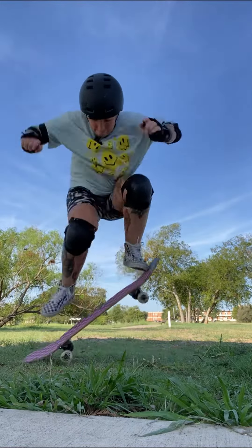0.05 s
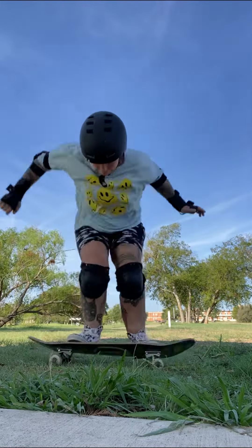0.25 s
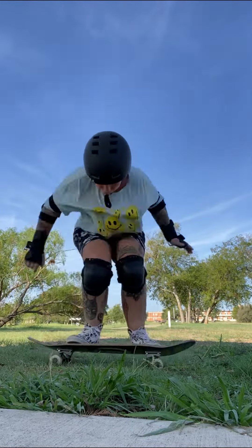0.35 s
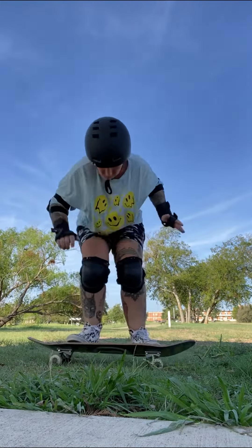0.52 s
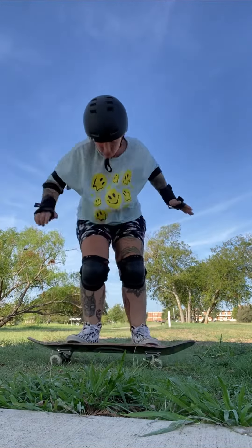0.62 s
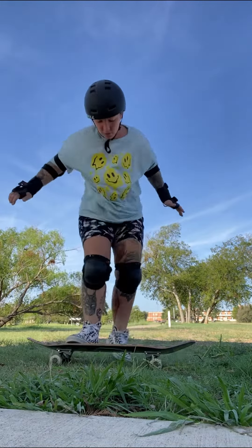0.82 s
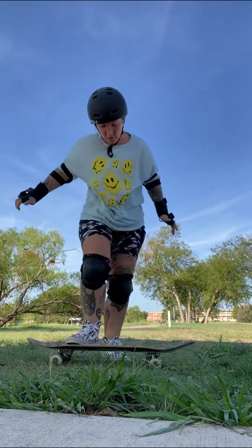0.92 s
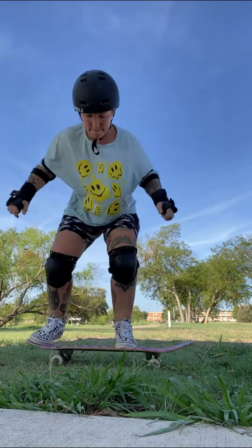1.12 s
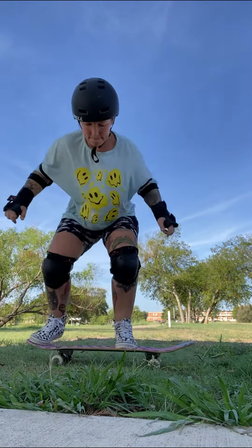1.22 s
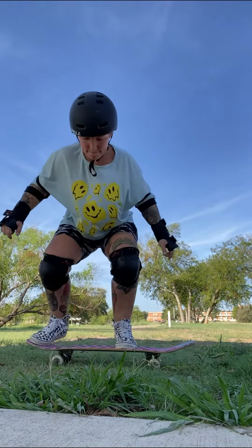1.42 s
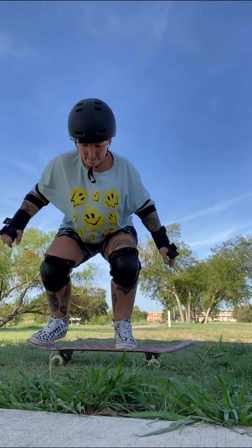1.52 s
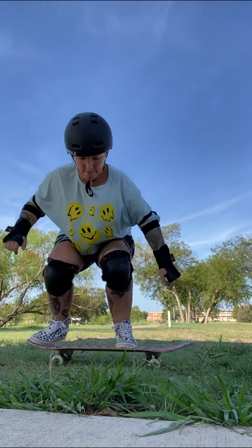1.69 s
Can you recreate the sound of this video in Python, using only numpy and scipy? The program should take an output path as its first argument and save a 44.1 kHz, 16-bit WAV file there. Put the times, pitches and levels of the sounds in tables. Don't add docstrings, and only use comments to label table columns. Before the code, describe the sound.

Hard woody skateboard knocks in three bursts, with truck rattle and faint shoe scuffs outdoors

```python
import sys
import numpy as np
from scipy import signal
from scipy.fft import rfft, irfft
from scipy.io import wavfile
from scipy.ndimage import uniform_filter1d

SR = 44100
rng = np.random.default_rng(int(sys.argv[2]) if len(sys.argv) > 2 else 0)


def to_wav(s):
    ch = np.atleast_2d(s).T
    pcm = np.round(np.clip(ch, -1, 1) * 32767)
    wavfile.write(sys.argv[1], SR, pcm.astype(np.int16))


def ratio(d):
    e = np.asarray(d, float) / 20
    return 10 ** e


N = 77175

# t/s, level/dB, favoured f/Hz, focus/(dB per octave squared), ring length/factor
SLAM_BLOWS = [(.2005, -15.5, 1390, 4, 0.5), (.2035, -8.5, 1270, 7.5, 0.46), (.2060, -8, 640, 5, 0.52),
              (.2125, -13.5, 1700, 11, 0.84), (.2215, -4, 420, 21, 0.22), (.2130, -8.5, 125, 3, 0.63),
              (.2265, -8.5, 149, 5.5, 0.74), (.2245, -16, 597, -0.5, 0.15), (.2320, -20, 197, 3, 0.72),
              (.2360, -18.5, 750, 21, 0.25), (.279, -34.5, 1680, 9, 0.58)]
TAIL_BLOWS = [
    (.6028, -7.5, 1600, 1.4, 0.15),
    (.6048, -7.5, 2510, 1.47, 0.33),
    (.6075, -13.5, 605, 2.56, 0.38),
    (.6120, -22, 920, 3, 0.35),
    (.6875, -25, 1360, 3.9, 0.25),
    (.8560, -20, 2500, 7.2, 0.46),
    (.8570, -8.5, 706, 4.8, 0.24),
    (.8580, -14, 2370, 6.2, 0.24),
    (.9042, -8.5, 2630, 2.8, 0.32),
]
STAMP_BLOWS = [(.8600, -12.5, 111, 5.6, 0.28), (.8610, -29, 1200, 1.02, 0.27), (.8700, -19, 1136, 16, 0.32),
               (.8845, -19.5, 820, 4.1, 0.24), (.9044, -2.5, 590, 2.6, 0.29), (.9080, -8.5, 140, 7.4, 0.41),
               (.9105, -14.5, 560, 1.1, 0.26), (.9135, -10.5, 550, 5, 0.31), (.9310, -11, 131, 2.5, .3),
               (.9210, -8, 695, 1.3, 0.38), (.9280, -10, 790, 0.87, 0.14), (.9390, -15, 606, 1.2, 0.4),
               (.9560, -11.5, 786, 33, 0.28), (.9680, -27, 720, 2.4, 0.93), (1.0590, -27, 910, 16, 0.32)]
JIGGLE_BLOWS = [
    (.0040, -31, 950, 10, 0.53),
    (.0130, -35.5, 900, 0.72, 0.25),
    (.0220, -34.5, 470, 20, 0.5),
    (.1040, -29, 920, 3.6, 0.35),
    (.1100, -37, 1200, 0.9, 0.25),
    (.1160, -45, 710, 1.5, 0.63),
    (.1545, -29, 680, 3.6, 1),
    (.4700, -27.5, 1700, 18, 0.35),
    (.4900, -23, 252, 19, 0.38),
]
# f/Hz, level/dB, t60/s
LOADED_DECK_MODES = [(74.8, -8.5, 0.34), (144.6, -3.5, 0.12), (234, -10.5, 0.11), (329, -8, 0.12),
                     (447.5, 3.5, 0.08), (555, -1, 0.092), (657.6, 8, 0.09), (752, -13, 0.05),
                     (1033, -3.5, 0.084), (1330, 1, 0.026), (1710, 3.5, 0.026), (1850, 2, 0.026),
                     (2780, -50, .05)]
TAIL_MODES = [(237, 7.5, 0.087), (510, 6, 0.031), (827, -1.5, 0.045), (1288, -1, 0.097), (1397, -4, 0.057),
              (1700, -6.5, 0.11), (1070, -10, 0.025), (1955, -9, 0.057), (2060, -28, 0.095),
              (2210, 6.5, 0.018), (2660, 3.5, 0.023), (3220, 2, 0.057), (4470, 8, 0.0058),
              (3810, -7.5, 0.013)]
FREE_DECK_MODES = [(103, -3, 0.17), (155, -4, 0.11), (261.3, -3.5, 0.16), (370, -14, .12),
                   (470, -4.5, 0.19), (567, 0.5, 0.13), (649.7, -11.5, 0.34), (744, -2, 0.087),
                   (849.7, -11, 0.32), (960, -8, 0.17), (1153, -3, 0.082), (1461, -8.5, 0.11),
                   (1920, -5, 0.028), (2900, -17, 0.12)]
# t/s, level/dB, t60/s, centre f/Hz, sizzle/dB
RATTLES = [(.0, -31.5, 0.18, 950, -4.5), (0.098, -42, 0.17, 1500, -3), (0.151, -38, 0.24, 1060, -3.5),
           (0.198, -22.5, 0.18, 1070, -18), (0.208, -26, 0.09, 1600, -3), (0.236, -35, 0.23, 1650, -11),
           (0.607, -34, 0.01, 3030, -16), (0.61, -29.5, 0.28, 2900, -22), (0.612, -30.5, 0.26, 585, -35.5),
           (0.854, -40, 0.04, 2790, -35.5), (0.858, -30.5, 0.52, 1530, -27), (0.903, -21, 0.042, 3000, -20),
           (0.905, -19.5, 0.25, 1510, -14), (0.916, -29, 0.2, 3500, -16), (1.058, -44.5, 0.16, 1740, -30)]
# t/s, level/dB, f/Hz, t60/s
HARD_TICKS = [(0.3793, -34, 3020, 0.0066), (0.3803, -46, 7300, 0.013), (0.4486, -33.5, 3030, 0.019),
              (0.451, -40.5, 7000, 0.0034), (.815, -48, 12500, 0.019), (1.227, -51, 3400, 0.011),
              (1.248, -50, 3650, 0.013), (0.0138, -28.5, 5100, 0.0053), (.003, -38, 7000, .01),
              (0.011, -40, 8200, 0.01), (.023, -36, 13000, 0.0098), (.035, -43, 7600, 0.02),
              (0.036, -40, 13000, 0.021), (1.058, -45.5, 5500, .03), (0.1, -44, 9200, 0.023),
              (.1531, -41.5, 5200, .012), (.1535, -44, 12800, 0.032), (.166, -31, 13500, .008),
              (.168, -40, 4700, .015), (0.178, -36, 12500, 0.016), (.179, -49, 7500, .012),
              (0.192, -49, 7700, .008), (0.2007, -29, 7400, 0.036), (.201, -31, 12900, 0.038),
              (0.215, -32, 6000, 0.018), (0.2138, -20, 12500, 0.015), (0.239, -36, 7000, 0.01),
              (0.237, -35, 12500, 0.014), (0.471, -47, 7450, .012), (0.483, -51, 7500, .01),
              (.553, -54.5, 7500, .01), (.592, -46, 6000, 0.02), (0.6024, -27, 7000, 0.0092),
              (.604, -42, 13000, .008), (.612, -46, 7400, 0.011), (.6871, -54, 7000, 0.007),
              (.7524, -41, 3000, 0.016), (0.8569, -24, 2980, .02), (0.889, -37, 7500, 0.017),
              (0.9021, -34, 5000, .01), (0.908, -22.5, 8200, 0.014), (0.939, -29, 8000, .01)]
# start t/s, length/s, level/dB
SOLE_DRAGS = [
    (0.242, 0.28, -58),
    (0.594, 0.23, -48),
    (1.006, 0.058, -44),
    (1.136, 0.12, -58),
    (1.415, .4, -51.5),
]
# f/Hz, width/Hz, level/dB
GRIP_BANDS = [(1200, 160, -4.5), (1700, 2400, -3.5), (3010, 700, 1), (3540, 180, -3.5), (4760, 1430, -4.5),
              (7000, 9800, -32.5)]
# f/Hz, level/dB per Hz
TOWN_SPECTRUM = [(45, -16.5), (114, -17.5), (180, -18.5), (320, -27), (700, -28.5), (1530, -37.5),
                 (4000, -46.5), (9000, -61)]
# t/s, level/dB
TOWN_LEVEL = [(.3, -39.5), (.48, -44), (.54, -46), (.62, -42.5), (1.0, -39.5), (1.1, -46.5), (1.34, -51),
              (1.45, -48)]
# f/Hz, width/Hz, level/dB
MACHINE_PARTIALS = [(58.2, 31, -50), (112.5, 21, -44.5), (143, 11, -67.5), (178, 20, -55.5)]
# f/Hz, width/Hz, turn/half turns
PORT_RESONANCES = [(5700, 450, 1.4), (9250, 200, 1), (11700, 200, 1), (14300, 250, 1)]

UNLIKE_DB = -11
BLUR_SAMPLES = 2048


def band(x, hz, width):
    return signal.lfilter(*signal.iirpeak(min(hz, .45 * SR), max(hz / width, .2), fs=SR), x)


def steep_band(x, hz, width):
    return band(band(x, hz, width), hz, width)


def unit(x):
    return x / np.sqrt(np.mean(x ** 2))


def walk(rate_hz):
    hold = int(SR / rate_hz)
    steps = np.repeat(rng.standard_normal(N // hold + 1), hold)
    return 0.82 * uniform_filter1d(uniform_filter1d(steps, hold), hold)[:N]


def two_port_noise(length, unlike):
    return rng.standard_normal(length) + unlike * rng.standard_normal((2, length))


def grit(rough_db):
    size = ratio(rough_db * rng.exponential(size=N))
    return unit(size * two_port_noise(N, ratio(UNLIKE_DB)))


def knocks(blows, modes):
    scatter_db, detune = 1.2, .012
    spread_cycles = 0.56
    out = np.zeros(N)
    hz, mode_db, t60 = np.array(modes).T[:, :, None]
    sign = (-1.) ** np.arange(len(modes))[:, None]
    luck = rng.standard_normal((len(blows), 2, len(modes), 1))
    for (s, level_db, best_hz, focus_db, ring), (vary, turn) in zip(blows, luck):
        first = int(s * SR) + 1
        age = np.arange(first, min(int(s * SR) + SR // 4, N)) / SR - s
        off_focus_db = focus_db * np.log2(hz / best_hz) ** 2
        gain = ratio(level_db + mode_db - off_focus_db + scatter_db * vary)
        swell = 1 - np.exp(-(age * hz / spread_cycles) ** 2)
        decay = 1000. ** (-age / (np.minimum(t60, .3) * ring))
        tone = sign * np.sin(2 * np.pi * hz * (1 + detune * turn) * age)
        out[first:][:len(age)] += (gain * swell * decay * tone).sum(axis=0)
    return out


def scatter(x):
    echo_db, echo_t60_s, echo_low_hz = -11.5, 0.068, 503
    age = np.arange(BLUR_SAMPLES) / SR
    echo = rng.standard_normal((2, BLUR_SAMPLES)) * 1000. ** (-age / echo_t60_s)
    echo = echo / np.sqrt((echo ** 2).sum(axis=1, keepdims=True))
    echo = signal.lfilter(*signal.butter(1, echo_low_hz, "high", fs=SR), echo)
    return x + ratio(echo_db) * signal.fftconvolve(x[None], echo)[:, :N]


def rattle(t):
    grain_db, chatter_db, attack_s = 2.4, 1.8, 0.0005
    out = 0
    for s, db, t60, hz, sizzle_db in RATTLES:
        grains = grit(grain_db)
        treble_edge = signal.butter(2, hz * 1.92, fs=SR)
        body = unit(signal.lfilter(*treble_edge, steep_band(grains, hz, hz * 2)))
        sizzle = sum(steep_band(grains, sizzle_hz, 4100) for sizzle_hz in (8900, 12800))
        age = np.maximum(t - s, 0)
        envelope = np.minimum(age / attack_s, 1) * 1000. ** (-age / t60)
        out = out + ratio(db + chatter_db * walk(150)) * envelope * (body + ratio(sizzle_db) * sizzle)
    return out


def ticks():
    out = np.zeros((2, N + BLUR_SAMPLES))
    age = np.arange(BLUR_SAMPLES) / SR
    for s, db, hz, t60 in HARD_TICKS:
        click = unit(steep_band(two_port_noise(BLUR_SAMPLES, ratio(UNLIKE_DB)), hz, hz * .7))
        out[:, int(s * SR):][:, :BLUR_SAMPLES] += ratio(db) * 1000. ** (-age / t60) * click
    return out[:, :N]


def scuffs(t):
    rise_s, flutter_db = .02, 1.4
    drag = 0
    for s, length, db in SOLE_DRAGS:
        drag = drag + ratio(db) * np.clip(np.minimum(t - s, s + length - t) / rise_s, 0, 1)
    rasp = 0
    for hz, width, db in GRIP_BANDS:
        ringing = unit(band(band(grit(2.87), hz, width), hz, 2 * width))
        rasp = rasp + ratio(db + flutter_db * walk(18.56)) * ringing
    return drag * unit(rasp)


def machine():
    out = 0
    for hz, width, db in MACHINE_PARTIALS:
        out = out + ratio(db) * unit(steep_band(rng.standard_normal(N), hz, width))
    return out


def town(t):
    rumble = 0
    table_hz, table_db = np.array(TOWN_SPECTRUM).T
    for hz in 40 * 2 ** np.arange(0, 8.1, .5):
        noise = two_port_noise(N, min(hz / 1000.0, .45))
        band_db = np.interp(np.log(hz), np.log(table_hz), table_db) + 10 * np.log10(hz)
        rumble = rumble + ratio(band_db + 2.7 * walk(8.96)) * unit(steep_band(noise, hz, hz / 2))
    return ratio(np.interp(t, *np.array(TOWN_LEVEL).T)) * unit(rumble)


def two_ports(near, t):
    shadow_hz, shadow_turns, side_swap_s = 1700, .6, .43
    hz = np.fft.rfftfreq(N, 1 / SR)
    half_turns = shadow_turns * (1 - np.exp(-hz / shadow_hz))
    for f, width, turn in PORT_RESONANCES:
        half_turns = half_turns + turn * (1 + np.tanh((hz - f) / width)) / 2
    far = irfft(rfft(near) * np.exp(-1j * np.pi * half_turns), N)
    first = t < side_swap_s
    pan_db = np.where(first, 3.5, 1.77) / 2
    return np.where([first, ~first], near, far) * ratio([pan_db, -pan_db])


def scene():
    t = np.arange(N) / SR
    wood = knocks(SLAM_BLOWS, LOADED_DECK_MODES) + knocks(TAIL_BLOWS, TAIL_MODES)
    wood += knocks(STAMP_BLOWS, FREE_DECK_MODES) + knocks(JIGGLE_BLOWS, FREE_DECK_MODES)
    near = scatter(wood) + rattle(t) + ticks() + scuffs(t) + machine() + town(t)
    return two_ports(near, t)


def roll_off(x):
    return signal.sosfilt(signal.butter(12, 15870, fs=SR, output="sos"), x)


def record(dry):
    t = np.arange(N) / SR
    change_s, recover_s, dip_db, ceiling = 1.032, 0.021, -21.5, 1.1
    dip_times = change_s + np.array([-.002, 0, .004, 0.0093 + recover_s])
    dip = np.interp(t, dip_times, [0, dip_db, dip_db, 0])
    x = signal.sosfilt(signal.butter(2, 45, "high", fs=SR, output="sos"), dry * ratio(dip))
    x[1] += 0.37 * band(x[1], 4500, 4500)
    x[0] -= 0.39 * band(x[0], 12500, 6250)
    x -= .8 * band(x, 10570, 890)
    x = ceiling * np.tanh(x / ceiling)
    x = signal.sosfilt(signal.ellip(8, .2, 70, 15800, fs=SR, output="sos"), x)
    return roll_off(x)


dry = scene()
out = record(dry)
to_wav(out)
```